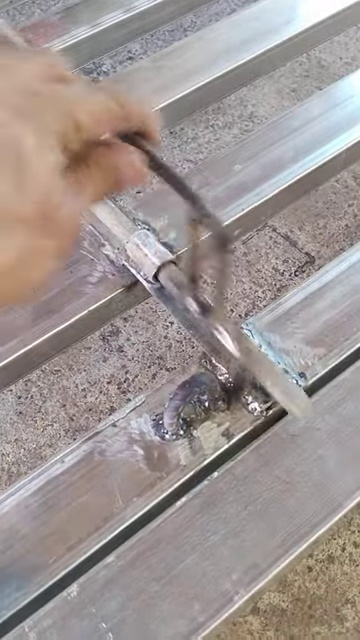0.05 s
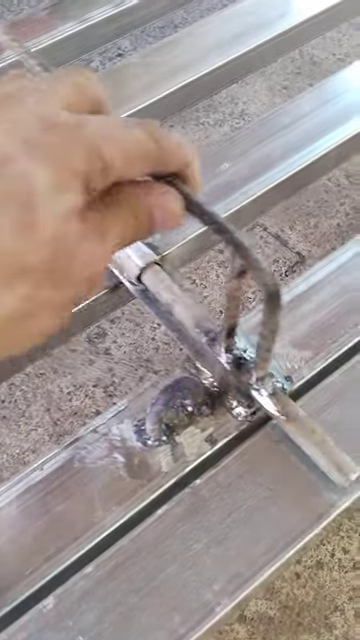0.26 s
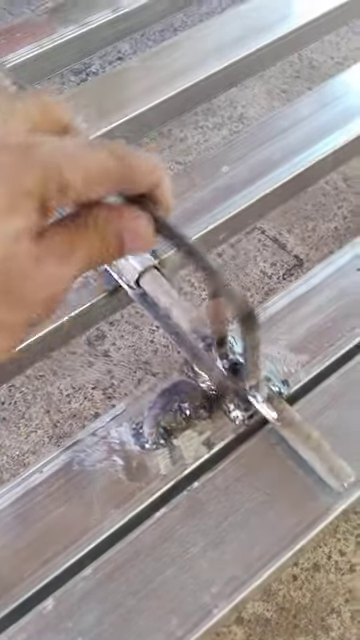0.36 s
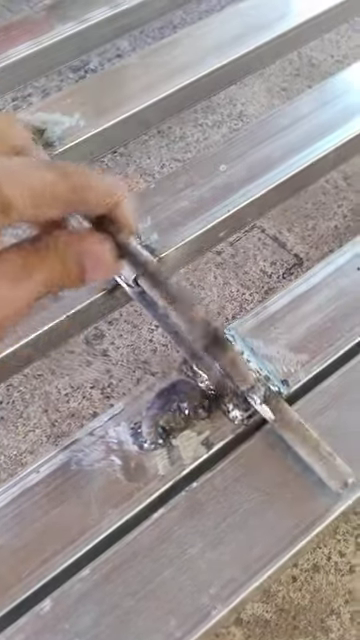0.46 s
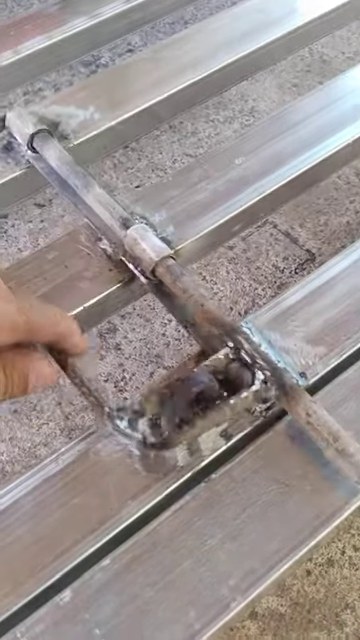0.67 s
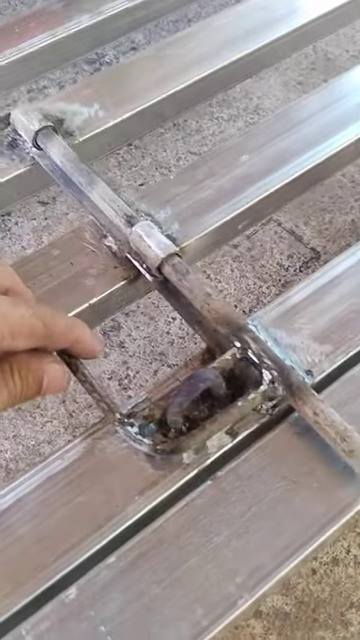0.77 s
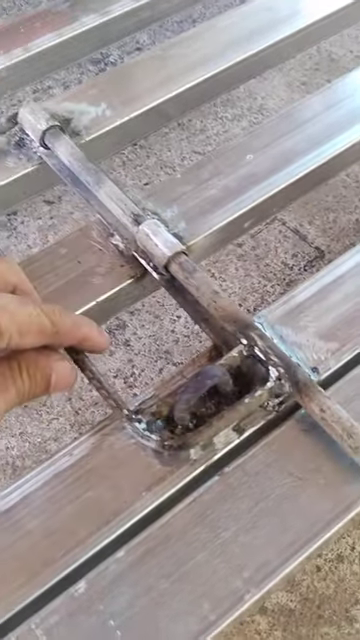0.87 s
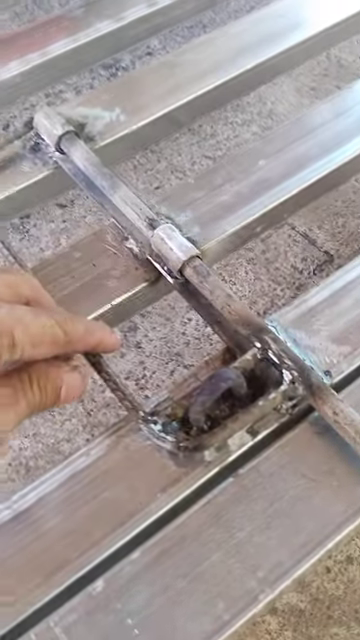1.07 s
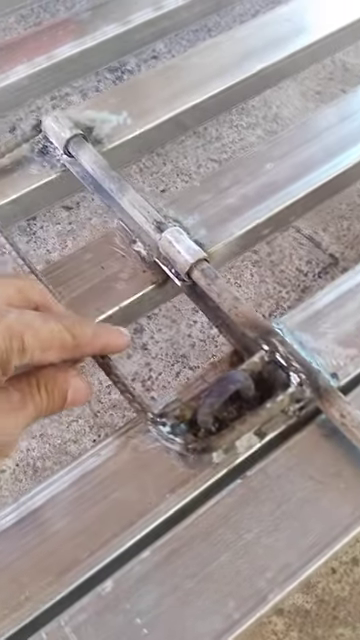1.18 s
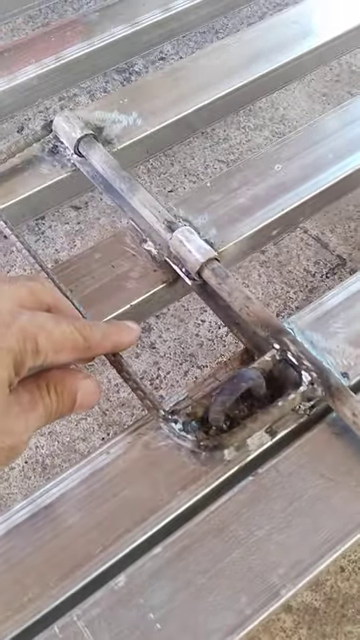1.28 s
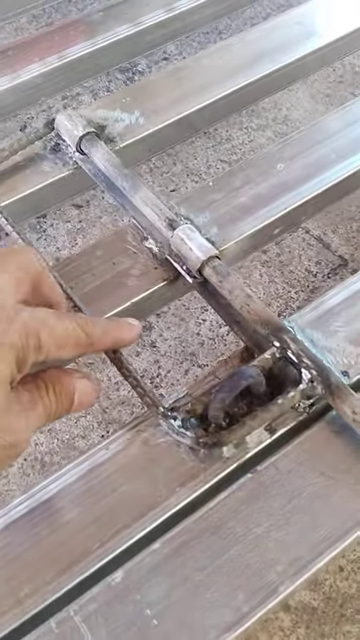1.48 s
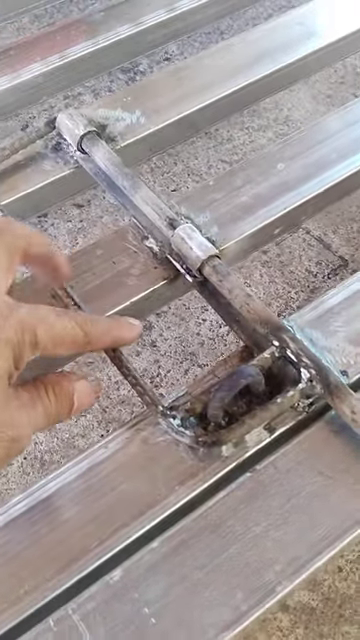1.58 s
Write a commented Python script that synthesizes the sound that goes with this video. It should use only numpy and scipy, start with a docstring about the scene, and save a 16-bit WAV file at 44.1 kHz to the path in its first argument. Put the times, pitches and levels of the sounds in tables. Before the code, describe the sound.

Metal bolt sliding on a gate, with a clunk, gritty scrape and bright clank.

```python
"""A faint steel ring and soft bumps over workshop rumble: a hand takes hold of a welded gate's bolt.
The bolt scrapes through its sleeves, sticking and slipping, and clunks against its stop.
Its handle turns down with a gritty scrape and faint squeaks, and lands with a bright clank.
Every contact is a short clash, then the ring of the solid bolt and the hollow bars of the frame."""
import sys
import numpy as np
from scipy import signal
from scipy.fft import rfft, irfft, next_fast_len
from scipy.io import wavfile

SR = 44100
rng = np.random.default_rng(int(sys.argv[2]) if len(sys.argv) > 2 else 0)


def generate_wav(signal):
    """Clip the signal to [-1, 1] and save it as 16-bit WAV at the path in sys.argv[1]."""
    frames = np.transpose(np.atleast_2d(signal))
    scaled = np.clip(frames, -1, 1) * 32767
    pcm = np.round(scaled).astype(np.int16)
    wavfile.write(sys.argv[1], SR, pcm)


N = 72765


def amp(db):
    """Decibels to gain."""
    return 10 ** (np.asarray(db) / 20)


def unit(x):
    """Scale to rms 1."""
    return x / np.sqrt(np.mean(x ** 2) + 1e-20)


def along(points, hz):
    """Read a curve of (Hz, value) points on a log frequency axis."""
    point_hz, values = np.transpose(points)
    return np.interp(np.log(hz + 1), np.log(point_hz + 1), values)


def filtered(x, response):
    """Filter x by a complex gain given as a function of Hz."""
    size = next_fast_len(N + SR // 2)
    return irfft(rfft(x, size) * response(np.fft.rfftfreq(size, 1 / SR)), size)[:N]


def noise(colour, size):
    """Noise of rms 1, coloured by (Hz, dB) points."""
    eq = amp(along(colour, np.fft.rfftfreq(size, 1 / SR)))
    return unit(irfft(rfft(rng.standard_normal(size)) * eq, size))


def add(out, start_s, x):
    """Mix x into out; a sound that starts before zero leaves only its tail."""
    start = round(start_s * SR)
    part = x[max(-start, 0):N - max(start, 0)]
    out[max(start, 0):][:len(part)] += part


def ring(modes):
    """Damped sines; neighbouring modes swing in opposite directions."""
    t = np.arange(N) / SR
    return sum((-1) ** k * amp(db - 60 * t / t60_s) * np.sin(2 * np.pi * hz * t)
               for k, (hz, db, t60_s) in enumerate(modes))


def steel_tones():
    """The clear tones of the gate: frame and bolt ringing in their strongest modes."""
    # hollow frame: pitch_hz, level_db, t60_s
    frame_modes = [(319.7, -9, 0.66), (720, -2, 0.62), (756.4, -7, 1.5), (764, -2.5, .5), (786, -10, 1.4),
                   (845, 3.5, 0.24), (882, -2.5, 0.46), (975, -14.5, 1.52), (984, -11.5, 1.6),
                   (1037, -15.5, 1.9), (1050.5, -7, 1.8), (1075, -7, 1.3), (1118, -15, 2.6),
                   (1220, -9.5, 1.3), (1267.7, 3, 0.63), (1306, -5, 1.3), (1324, -4, 1.12),
                   (1430, -7.5, 0.4), (1487, 2, 0.45), (1541, -5, 1.64), (1518, -4.5, 1.1), (1555, 0, 1.3),
                   (1635, 0.5, 0.62), (1785, -1.5, .85), (1957, -5, 0.87), (2063, -2.5, 0.97),
                   (2072, -8.5, 1.1), (2270, -7.5, 0.84), (2410, -12.5, 1.6), (2522, -13.5, 1.5),
                   (2716, -13.5, 1.8), (2837, -1, 0.96)]
    # solid bolt and handle: pitch_hz, level_db, t60_s
    bolt_modes = [(1585, 11, 0.064), (2400, 14, 0.033), (3057, -14, 0.34), (3060, -16.5, 1.5),
                  (3470, -17.5, 2.1), (3705, -6, 0.91), (3967, -0.5, 0.32), (4100, -9, 1.3),
                  (4335, -6.5, 1.1), (4393, -9, 1.4), (4280, -11, 1.9), (5000, 6, 0.23), (5152, -5.5, 0.55),
                  (5345, 1.5, .35), (6578, -1, .37), (8182, -2, .3)]
    return amp(-21) * (ring(frame_modes) + ring(bolt_modes))


def weak_modes(spacing_hz=11, spread_db=1.5):
    """Line spectrum of the gate's weak modes, uneven in spacing and strength."""
    lines = np.zeros(next_fast_len(N) // 2 + 2)
    count = int(SR / 2 / spacing_hz)
    place = (np.arange(count) + rng.random(count)) / count
    lines[(place * len(lines)).astype(int)] = amp(spread_db * rng.standard_normal(count))
    return lines


def shimmer(lines, size=512):
    """The diffuse ring of the weak modes, stirred differently by each contact; the highs die first."""
    # colour of the ring: pitch_hz, level_db
    colour = [(60, -55), (170, -30), (320, -11.5), (480, -17), (700, -7.5), (1250, -6.5), (1800, 0.5),
              (2700, -5), (3400, -10.5), (4600, -5), (5900, -9), (7000, -6.5), (10000, -12)]
    # ring time: pitch_hz, t60_s
    decay = [(300, 1.5), (550, 1.16), (750, 1.42), (880, 0.69), (1050, 1.94), (1300, 1.62), (1430, 1.04),
             (1600, 1.4), (1720, 0.73), (2500, 1.304), (4500, 1.134), (5300, 0.91), (5800, 0.62),
             (7500, 0.48), (10500, 0.39)]
    phases = np.exp(2j * np.pi * rng.random(len(lines)))
    steady = unit(irfft(lines * phases))[:N]
    hz, t, spectra = signal.stft(steady, SR, nperseg=size)
    eq = unit(amp(along(colour, hz)))[:, None]
    fade = amp(-60 * t / along(decay, hz)[:, None])
    return signal.istft(spectra * eq * fade, SR, nperseg=size)[1][:N]


def gate(steel, ring_db, tones_db, clash_t60_s=0.061, size=8192):
    """The steel answers one contact: a short clash, then diffuse ring and clear tones."""
    # harsh noise of the attack: pitch_hz, level_db
    clash_colour = [(60, -41), (200, -17.5), (450, -3), (720, 8), (980, 6), (1500, 6.5), (2400, -5.5),
                    (3200, 3), (5000, 2.5), (6500, -0.5), (10000, -3.5)]
    tones, lines = steel
    out = amp(ring_db - 10) * shimmer(lines) + amp(tones_db) * tones
    clash_fade = amp(-1 - 60 * np.arange(size) / SR / clash_t60_s)
    add(out, 0, clash_fade * noise(clash_colour, size))
    return out


def knocks(steel):
    """Each blow rings the gate anew; a harder contact is brighter. The first is only a tail."""
    # blows on the frame: start_s, level_db, hardness_hz, low_cut_hz, ring_db, tones_db
    blows = [(-.42, -5, 2200, 700, 3.5, 5), (0.2855, -3.5, 7000, 1300, 0, 1),
             (0.2902, 4.5, 1800, 480, -10.5, -5.5), (.301, -1, 2400, 1120, 5, -13),
             (.3275, -13, 2000, 900, -7, -12), (.596, -41.5, 14000, 8700, 13.5, 0),
             (.639, -10, 230, 120, 7, -14.5), (0.664, -2, 442, 121.5, -5, -8.5),
             (.704, -12.5, 700, 150, 8, -5), (.7895, -11, 1200, 400, -8, 0.5),
             (.8695, -28, 1300, 400, -16, -8), (0.8756, 0.5, 10000, 1332, 0, 2),
             (0.8775, -11, 18100, 4600, 7.5, -11.5), (.8838, -0.5, 750, 1200, -35, -15.5),
             (0.8952, 3, 800, 1100, -8, -26.5), (0.972, -21, 9000, 1500, -19, -12)]
    out = np.zeros(N)
    for start_s, level_db, hardness_hz, low_cut_hz, ring_db, tones_db in blows:
        def contact(hz):
            low_cut = 1j * hz / (low_cut_hz + 1j * hz)
            return low_cut / (1 + 1j * hz / hardness_hz) / (1 + .5j * hz / hardness_hz)
        add(out, start_s, amp(level_db - 9) * filtered(gate(steel, ring_db, tones_db), contact))
    return out


def workshop():
    """Room tone: a low, steady rumble."""
    # colour of the room tone: pitch_hz, level_db
    colour = [(25, -14.5), (55, -7), (95, 1), (135, 9), (200, -6), (320, -5), (500, -17), (850, -19.5),
              (1100, -3.5), (2000, -77.5), (4500, -46.5), (6500, -34), (10000, -38)]
    return amp(-54) * noise(colour, next_fast_len(N))[:N]


def bumps(rise_s=0.0019):
    """The whole gate shudders softly as the hand takes hold."""
    # dull touches: start_s, level_db
    touches = [(0, -48), (0.086, -47), (0.152, -44)]
    # lowest modes of the gate: pitch_hz, level_db, t60_s
    sway_modes = [(95.5, -0.5, 1), (162.6, 0, 0.31), (238, -2, 0.4), (311, -3, 0.34), (459, -7.5, .25)]
    out = np.zeros(N)
    attack = 1 - np.exp(-np.arange(N) / SR / rise_s)
    for start_s, level_db in touches:
        add(out, start_s, amp(level_db) * attack * ring(sway_modes))
    return out


def rub(force, colour, body, slips_per_s=4000, spread_db=4.5):
    """The bolt sticks and slips in its sleeves: a stream of tiny uneven contacts into the gate."""
    slips = (rng.random(N) < slips_per_s / SR) * np.sign(rng.standard_normal(N))
    slips *= amp(spread_db * rng.standard_normal(N))
    force_db = np.interp(np.arange(N) / SR, *np.transpose(force), left=-120, right=-120)
    drive = unit(slips) * amp(force_db + 4.5) / np.sqrt(SR)
    scrape = signal.fftconvolve(drive, body)[:N]
    return filtered(scrape, lambda hz: amp(along(colour, hz)))


def push(steel):
    """The bolt slides home, its scrape swelling up to the stop."""
    # rubbing force: time_s, level_db
    force = [(0, -26), (.125, -42.5), (.16, -23), (.205, -11), (.24, -2), (.28, -1.5), (.30, -19),
             (.34, -55)]
    # EQ of the slide: pitch_hz, gain_db
    colour = [(100, 4.5), (200, 8.5), (450, 4), (620, 4), (800, 5.5), (1020, 1), (1300, 7), (1750, -8),
              (2000, -0.5), (2400, -8.5), (3000, -2), (3700, -11), (5000, -12), (10000, -14.5)]
    return rub(force, colour, gate(steel, ring_db=-1.5, tones_db=-7))


def turn(steel):
    """The handle swings down and grinds the bolt round in its sleeves."""
    # rubbing force: time_s, level_db
    force = [(.61, -46), (.645, -18), (.68, -12), (.715, -6.5), (.76, -11.5), (.80, -14.5), (.84, -23),
             (.87, -11.5), (.9, -73)]
    # EQ of the grind: pitch_hz, gain_db
    colour = [(130, -3.5), (320, 11), (500, -5.5), (720, 7.5), (850, 1.5), (1400, -0.5), (2200, 0),
              (3600, -10), (6000, -18.5), (10000, -20)]
    return rub(force, colour, gate(steel, ring_db=-3, tones_db=-6))


def squeaks(pitch_hz=8240, width_hz=130, swell_s=0.0079):
    """The dry bolt sings briefly in its sleeve as it turns: swells of narrow-band noise."""
    # faint squeaks: peak_s, level_db
    peaks = [(0.779, -54), (.84, -55.5)]
    t = np.arange(N) / SR
    swell = sum(amp(db) * np.exp(-((t - peak_s) / swell_s) ** 2) for peak_s, db in peaks)
    whistle = filtered(rng.standard_normal(N), lambda hz: np.exp(-((hz - pitch_hz) / width_hz) ** 2))
    return swell * unit(whistle)


def scene():
    """Push, turn and clank, close up and in mono."""
    steel = steel_tones(), weak_modes()
    return (push(steel) + turn(steel) + squeaks() + knocks(steel) + bumps() + workshop())[None]


def record(dry):
    """A steep low-pass takes off the top end."""
    top_hz = 10500
    return signal.sosfilt(signal.ellip(10, .3, 80, top_hz, fs=SR, output="sos"), dry)


dry = scene()
out = record(dry)
generate_wav(out)
```